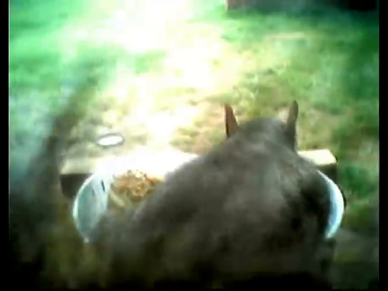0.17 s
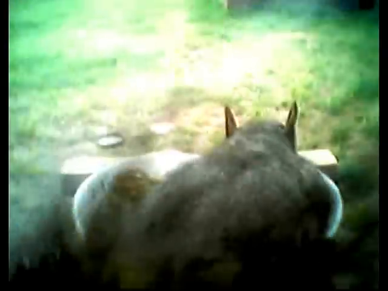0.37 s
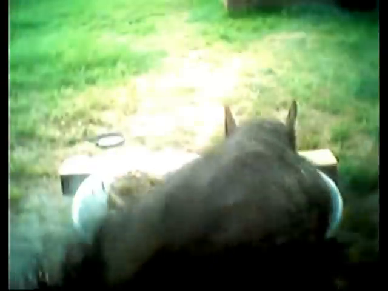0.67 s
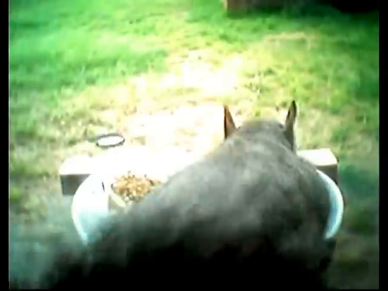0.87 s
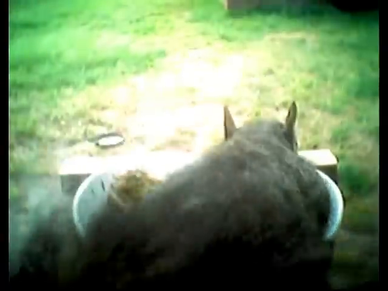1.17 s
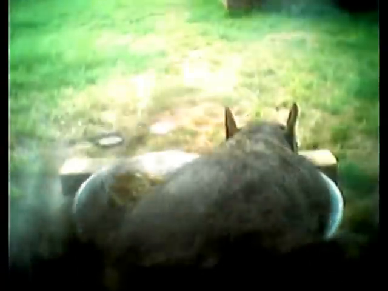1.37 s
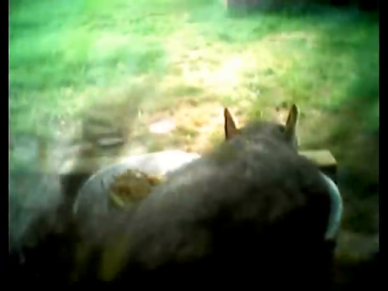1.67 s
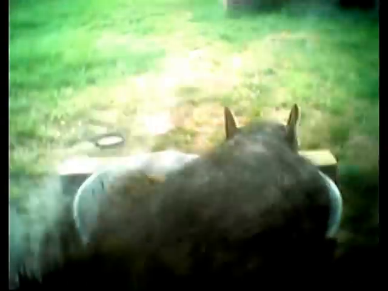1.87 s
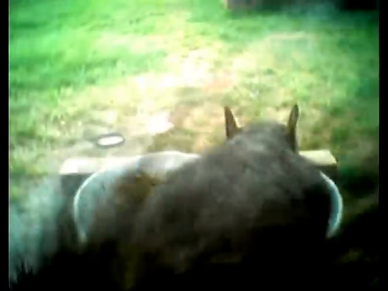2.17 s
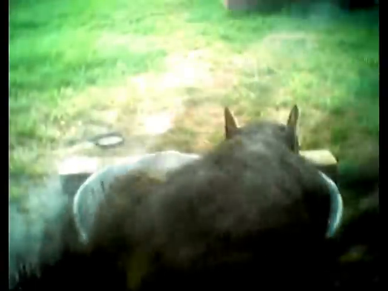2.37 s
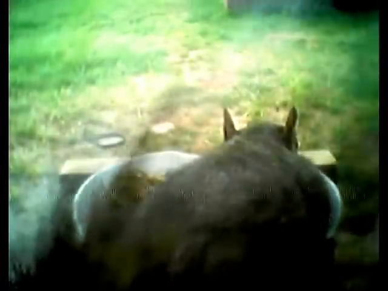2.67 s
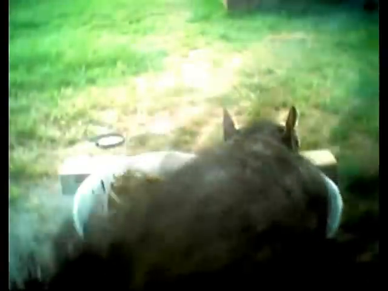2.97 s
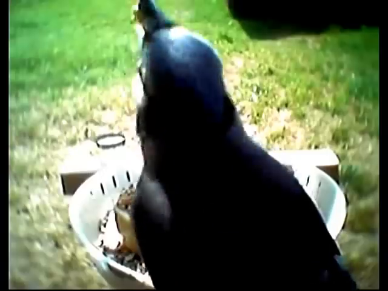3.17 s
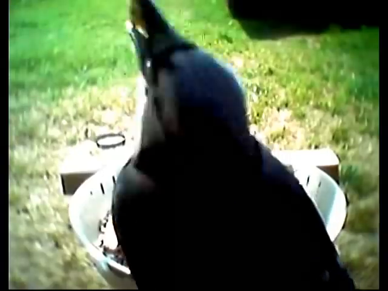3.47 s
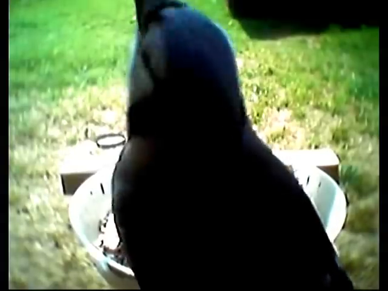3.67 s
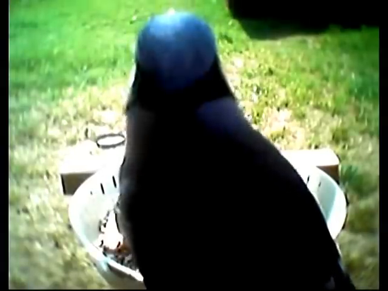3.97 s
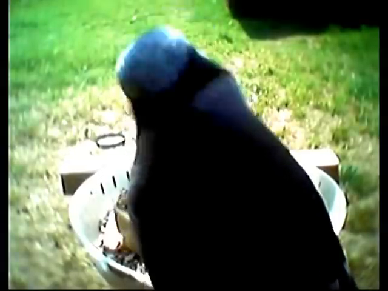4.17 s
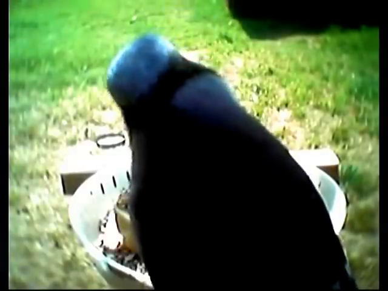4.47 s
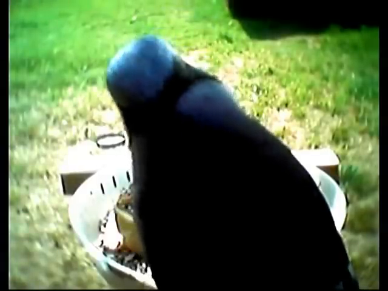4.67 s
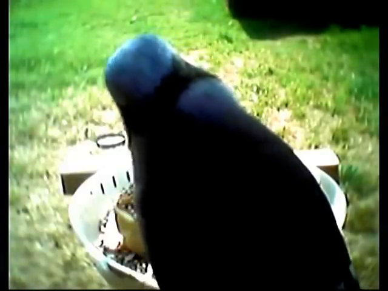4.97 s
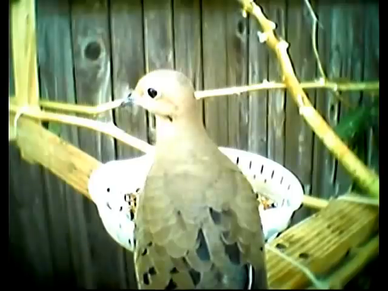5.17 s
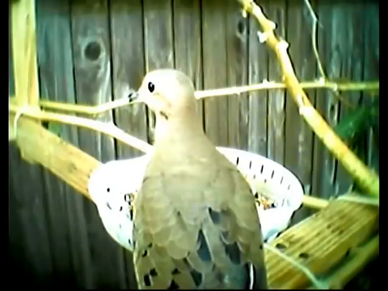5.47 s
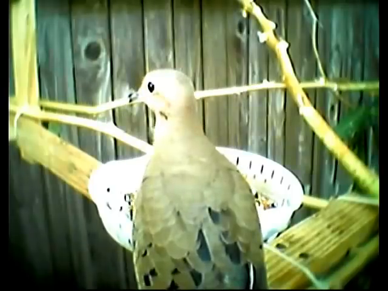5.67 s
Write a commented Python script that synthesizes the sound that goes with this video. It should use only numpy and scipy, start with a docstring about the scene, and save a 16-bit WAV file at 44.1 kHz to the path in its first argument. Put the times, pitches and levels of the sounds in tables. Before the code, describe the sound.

For the first three seconds, a songbird in a backyard repeats a quick down-and-up whistle nine times, evenly spaced, over soft outdoor air. Distant birds answer faintly early on, and a light tick comes near 1.9 seconds. After a brief silence at 3 seconds, a bird right beside the small feeder microphone gives a hoarse rising call. A light tap follows at 3.7, a sinking quaver at 3.8, another rising call at 4, and a hoarse, wavering scream from 4.25 to 4.5, all slightly overloaded. A dull, crackly knock hits the microphone just after. Following another short silence near 5.2 seconds, a low drone with soft hiss holds until the sound cuts off at 5.6. All of this is on the left. A steady electrical buzz runs underneath, faint on the left and alone with electronic hiss on the right.

```python
"""A feeder camera in a backyard plays three shots with short silences between. First a songbird repeats a down-
and-up whistle while far birds answer. In the second shot a close bird gives rising calls, a quaver and a hoarse
scream that overload the small microphone; a dull knock follows. The last shot holds a low drone and faint far
chatter. All this is on the left, over outdoor air. Throughout, the picture signal leaks into the sound as a
buzz: faint on the left, and alone with electronic hiss on the right."""
import sys
import numpy as np
from scipy import signal
from scipy.fft import rfft, irfft
from scipy.io import wavfile

SR = 44100
rng = np.random.default_rng(int(sys.argv[2]) if len(sys.argv) > 2 else 0)


def put_to_file(sound):
    """Save the sound as 16-bit audio at rate SR, in the file named by the first command-line argument."""
    columns = np.atleast_2d(sound).T  # one column per channel
    safe = np.clip(columns, -1, 1)
    whole_steps = np.round(safe * 32767)
    wavfile.write(sys.argv[1], SR, whole_steps.astype(np.int16))


N = 256220
TIME = np.arange(N) / SR


def undb(db):
    """Turn decibels into a gain to multiply by."""
    return 10 ** (np.asarray(db) / 20)


def band(x, low_hz, high_hz, order=2):
    """Keep the sound between two frequencies."""
    edges_hz = [low_hz, min(high_hz, .45 * SR)]
    return signal.sosfilt(signal.butter(order, edges_hz, "band", fs=SR, output="sos"), x)


def rolloff(x, hz, order=2):
    """Soften the treble above hz."""
    return signal.sosfilt(signal.butter(order, min(hz, .45 * SR), fs=SR, output="sos"), x)


def walk(rate_hz):
    """A random curve that wanders around zero with a spread near 1."""
    knots_s = np.arange(0, N / SR + 1, 1 / rate_hz)
    return np.interp(TIME, knots_s, rng.standard_normal(len(knots_s)))


def noise(points):
    """Noise shaped by rows of frequency_hz, level_db_per_hz."""
    hz, db = np.transpose(points)
    bins_hz = np.maximum(np.arange(N // 2 + 1) * SR / N, 1)
    gain = undb(np.interp(np.log(bins_hz), np.log(hz), db))
    return irfft(rfft(rng.standard_normal(N)) * gain, N) * np.sqrt(SR / 2)


def gate(t, start_s, end_s, edge_s):
    """A gain that opens softly at the start and closes softly at the end."""
    return np.sin(np.pi / 2 * np.clip(np.minimum(t - start_s, end_s - t) / edge_s + .5, 0, 1)) ** 2


def bounce(x, delay_s, gain_db):
    """The sound plus its reflection off one surface."""
    return x + undb(gain_db) * np.pad(x, (int(delay_s * SR), 0))[:N]


def echoes(x, early_db, early_s, late_db, late_s):
    """Fence and house wall answer quickly; trees scatter a longer, thin tail without treble."""
    t = TIME[:SR]
    early, late = rng.standard_normal((2, SR)) * (t > .006)
    early *= np.exp(-t / early_s)
    late *= undb(-60 * t / late_s)
    walls = undb(early_db) * early / np.linalg.norm(early)
    trees = undb(late_db) * rolloff(late / np.linalg.norm(late), 3700, order=4)
    return x + signal.fftconvolve(x, walls + trees)[:N]


def yard_air():
    """Gently wavering outdoor air, heard through a microphone that favours 2.2 kHz."""
    # tone colour of the air: frequency_hz, level_db_per_hz
    spectrum = [(25, -80.5), (120, -80.5), (300, -75.5), (600, -77.5), (1100, -80.5), (1600, -82),
                (1950, -79.5), (2230, -73.5), (2600, -83), (3200, -92.5), (4500, -99), (7000, -105),
                (11000, -114)]
    return noise(spectrum) * undb(1.7 * walk(5.5))


def electronic_hiss():
    """The steady noise of the buzzing channel's electronics."""
    # tone colour of the hiss: frequency_hz, level_db_per_hz
    spectrum = [(25, -76.5), (120, -90), (500, -93.5), (1500, -101), (5000, -107), (11000, -115)]
    return noise(spectrum)


def fence_drone():
    """A low drone and soft hiss by the fence, a faint wash of far bird chatter near 2.1 kHz, and one tone that
    wavers in level."""
    # tone colour of the drone, hiss and far chatter: frequency_hz, level_db_per_hz
    spectrum = [(25, -88), (100, -83), (250, -72), (480, -76), (800, -90), (1600, -89), (2080, -74.5),
                (2600, -103), (4000, -130)]
    # the drone's tone: pitch_hz, level_db
    tone = (485, -55.5)
    pitch_hz, level_db = tone
    wave = np.sqrt(2) * np.sin(2 * np.pi * pitch_hz * TIME)
    return noise(spectrum) + undb(level_db + 2 * walk(9.1)) * wave


def picture_buzz(start_s, lower_brightness, fade_share):
    """Each scan down the picture starts on bright lawn, dims and ends blank; these pulses buzz."""
    scan_hz, lawn_share, blank_share = 59.94, .13, .087
    position = (TIME - start_s) * scan_hz % 1
    lawn = np.clip(1 - (position - lawn_share) / fade_share, 0, 1)
    brightness = (lower_brightness + (1 - lower_brightness) * lawn) * (position < 1 - blank_share)
    return rolloff(brightness.mean() - brightness, 4100)


def feeder_taps():
    """Light taps at the feeder, each a burst of noise that dies at once."""
    # dry ticks: start_s, peak_db, centre_hz, decay_s
    taps = [(1.879, -33, 2110, 0.0023), (3.72, -26, 2160, 0.0015), (4.515, -39.5, 250, 0.0018)]
    out = np.zeros(N)
    for start_s, peak_db, centre_hz, decay_s in taps:
        burst = rng.standard_normal(N) * (TIME >= start_s) * np.exp(-abs(TIME - start_s) / decay_s)
        tick = band(burst, centre_hz / np.sqrt(3), centre_hz * np.sqrt(3), order=6)
        out += undb(peak_db) * tick / abs(tick).max()
    return out


def microphone_knock():
    """A dull knock pushes the microphone's thin diaphragm aside with a crackle."""
    # the push: start_s, level_db, length_s
    knock = (4.547, -14.5, 0.0019)
    start_s, level_db, length_s = knock
    progress = np.maximum(TIME - start_s, 0) / length_s
    push = np.clip(1 - progress ** 2, 0, 1)
    crackle = .58 * np.exp(-progress / .7) * band(rng.standard_normal(N), 5000, 10500, order=1)
    return undb(level_db) * (TIME >= start_s) * (crackle - push)


def whistles(notes, waver, flutter_db, edge_s, rasp_db,
             clearing_db=0, rasp_width_hz=400, rasp_above_hz=0, octave=0):
    """A bird's voice organ (syrinx) makes a trembling, gliding tone; a rasp follows its pitch."""
    tremble = 1 + waver * (walk(220) + walk(60)) / np.sqrt(2)
    grit = rolloff(rng.standard_normal(N) + 1j * rng.standard_normal(N), rasp_width_hz / 2, order=5)
    out = np.zeros(N)
    for note in notes:
        time_s, pitch_hz, level_db = np.transpose(note)
        span = (TIME > time_s[0] - edge_s) & (TIME < time_s[-1] + edge_s)
        t = TIME[span]
        phase = 2 * np.pi * np.cumsum(np.interp(t, time_s, pitch_hz) * tremble[span]) / SR
        tone = np.exp(1j * phase)
        rasp = undb(rasp_db - clearing_db * np.linspace(0, 1, len(t))) * grit[span] / grit.std()
        voice = tone * (1 + rasp * np.exp(2j * np.pi * rasp_above_hz * t))
        overtone = octave * (voice * tone).real  # twice the pitch
        loudness = gate(t, time_s[0], time_s[-1], edge_s) * undb(np.interp(t, time_s, level_db))
        out[span] += loudness * (voice.imag + overtone)
    return np.sqrt(2) * out * undb(flutter_db * walk(160))


def far_birds():
    """Birds further off give faint, gliding notes that fade as they go."""
    # straight glides: start_s, length_s, start_hz, end_hz, end_db
    glides = [(.225, 0.022, 2163, 1890, -46.5), (.27, 0.079, 2380, 2495, -50), (.55, 0.14, 2410, 2376, -51),
              (.56, 0.17, 2165, 2038, -51), (4.1, 0.0098, 2900, 2843, -44), (4.14, 0.015, 2820, 2870, -50)]
    fade_db_per_s = 45.5
    notes = [[(start_s, start_hz, end_db + fade_db_per_s * length_s), (start_s + length_s, end_hz, end_db)]
             for start_s, length_s, start_hz, end_hz, end_db in glides]
    calls = whistles(notes, waver=.03, flutter_db=2.5, edge_s=.012, rasp_db=-6)
    return echoes(calls, early_db=-8, early_s=.041, late_db=-5.5, late_s=.66)


def songbird():
    """Each whistle flicks up, falls loud and clear, then rises softly and levels off at a crest."""
    # one whistle a row; crest_s and length_s count from start_s, the top of the fall:
    # start_s, top_hz, dip_hz, crest_hz, fall_s, bend (1 = straight), crest_s, length_s,
    # flick_db, fall_db, rise_db
    slurs = [(0.044, 2734, 2227, 3270, 0.044, 1.26, 0.17, 0.17, -48, -25.5, -45),
             (0.383, 2667, 2117, 3240, 0.046, 1.58, 0.13, 0.143, -31.5, -26.5, -39),
             (0.717, 2810, 2251, 3180, 0.067, 4.5, 0.13, 0.14, -43.5, -29.5, -45.5),
             (1.101, 2718, 2323, 3180, 0.05, 1.75, 0.13, 0.16, -47, -28.5, -43),
             (1.459, 2964, 2207, 3418, 0.052, 3.3, 0.13, 0.16, -43, -26.5, -41.5),
             (1.816, 2805, 2160, 3220, 0.045, 2.33, 0.12, 0.14, -27.5, -26, -38),
             (2.187, 2930, 2160, 3214, 0.043, 1.1, 0.138, 0.143, -44, -29, -42.5),
             (2.546, 2560, 2200, 3200, 0.049, 2.37, 0.13, 0.14, -57, -28.5, -42),
             (2.877, 2696, 2230, 3195, 0.038, 1.17, 0.14, 0.15, -33.5, -29, -42)]
    flick_hz, flick_s, turn_s = 2200, .0075, .016
    rise_from_hz, rise_bend, swell_db = 2695, 1.4, 3.5
    # just before each rise ends, pitch and level dip for a moment: the catch
    catch_before_end_s, catch_s, catch_hz, catch_db = .036, .006, 150, 6
    progress = np.linspace(0, 1, 40)
    arch_db = 7.5 * np.interp(progress, [0, .46, 1], [1, 0, 1]) ** 2  # a fall is weaker at both ends
    falls, rises = [], []
    for (start_s, top_hz, dip_hz, crest_hz, fall_s, bend, crest_s, length_s,
         flick_db, fall_db, rise_db) in slurs:
        fall_hz = dip_hz + (top_hz - dip_hz) * (1 - progress) ** bend
        fall = np.transpose([start_s + fall_s * progress, fall_hz, fall_db - arch_db])
        falls.append(np.vstack([(start_s - flick_s, flick_hz, flick_db), fall]))
        age_s = fall_s + turn_s + (length_s - fall_s - turn_s) * progress
        catch = np.exp(-((age_s - length_s + catch_before_end_s) / catch_s) ** 2)
        below_crest = abs((crest_s - age_s) / (crest_s - age_s[0])) ** rise_bend
        rise_hz = crest_hz - (crest_hz - rise_from_hz) * below_crest - catch_hz * catch
        level_db = rise_db - swell_db * (1 - progress) ** 2 - catch_db * catch
        rises.append(np.transpose([start_s + age_s, rise_hz, level_db]))
    song = whistles(falls, waver=.009, flutter_db=1, edge_s=.004, rasp_db=-21)
    song += whistles(rises, waver=.011, flutter_db=2.6, edge_s=.007, rasp_db=-11)
    song = bounce(song, delay_s=.00258, gain_db=-4.5)  # the ground: boosts some pitches, weakens others
    song = bounce(song, delay_s=.068, gain_db=-20)  # the house
    return echoes(song, early_db=-8.5, early_s=.022, late_db=-11.5, late_s=.67)


def close_bird():
    """Beside the microphone: rising calls that start hoarse and clear, a quaver and a two-voiced scream."""
    # two calls that swell as they climb, one list each: time_s, pitch_hz, level_db
    rising_calls = [
        [(3.12, 1875, -27), (3.142, 1956, -34.5), (3.152, 2035, -23), (3.172, 2054, -22), (3.18, 2127, -18),
         (3.209, 2208, -18)],
        [(4.01, 2110, -34.5), (4.022, 1951, -34.5), (4.05, 2015, -31), (4.08, 2081, -22.5),
         (4.094, 2174, -21.5), (4.103, 2165, -25)],
    ]
    # a trembling call that sinks: time_s, pitch_hz, level_db
    quaver = [(3.828, 2403, -39.5), (3.842, 2200, -31), (3.85, 2130, -34.5), (3.856, 2395, -32),
              (3.866, 2166, -19.5), (3.874, 2346, -27), (3.884, 2183, -21.5), (3.892, 2253, -25.5),
              (3.904, 2108, -25.5), (3.918, 2140, -21), (3.926, 2139, -37), (3.942, 2260, -26.5),
              (3.948, 2217, -20), (3.96, 2090, -30), (3.977, 2115, -31.5)]
    # a hoarse call that wavers and sinks: time_s, pitch_hz, level_db
    scream = [(4.247, 2252, -36), (4.26, 2838, -37.5), (4.272, 2490, -25), (4.288, 2191, -17.5),
              (4.316, 2213, -17.5), (4.338, 2090, -23), (4.361, 2228, -19.5), (4.368, 2267, -21.5),
              (4.39, 2123, -32), (4.426, 1993, -27.5), (4.466, 2031, -25.5), (4.498, 1994, -32.5),
              (4.52, 2032, -32)]
    # higher tones beside the calls: the first row is a brief higher note heard as the shot opens; the others
    # are the syrinx's other side singing higher and beating with the calls: time_s, pitch_hz, level_db
    upper_voice = [
        [(3.098, 2180, -33.5), (3.13, 2310, -32)],
        [(3.959, 2380, -40), (3.977, 2370, -41.5)],
        [(4.284, 2494, -27.5), (4.302, 2785, -40.5), (4.322, 2542, -32.5), (4.36, 2720, -57), (4.41, 2756, -47),
         (4.47, 2660, -53)],
    ]
    octave = .028  # strength of the overtone, as a share of the main tone
    calls = whistles(rising_calls, waver=.009, flutter_db=1.2, edge_s=.005, rasp_db=-4,
                     clearing_db=17, rasp_width_hz=560, rasp_above_hz=70, octave=octave)
    calls += whistles([quaver], waver=.008, flutter_db=1.2, edge_s=.006, rasp_db=-16, octave=octave)
    calls += whistles([scream], waver=.008, flutter_db=1.1, edge_s=.006, rasp_db=-16,
                      rasp_width_hz=700, rasp_above_hz=220, octave=octave)
    calls += whistles(upper_voice, waver=.025, flutter_db=3, edge_s=.006, rasp_db=-3, octave=octave)
    calls = bounce(calls, delay_s=.043, gain_db=-9.5)  # a wall
    return echoes(calls, early_db=-9, early_s=.061, late_db=-15, late_s=.95)


def overload(x):
    """A lopsided amplifier bends the wave and flattens its tops, adding overtones and a low flutter."""
    bend, ceiling, sharpness = .38, .118, 6
    bent = x - bend * x ** 2
    upward = np.maximum(bent, 0)
    flattened = upward / (1 + (upward / ceiling) ** sharpness) ** (1 / sharpness)
    return rolloff(np.minimum(bent, 0) + flattened, hz=5500, order=4)


def scene():
    """Microphone on the left, picture buzz and hiss on the right, both cut shot by shot."""
    # when the sound is on: start_s, end_s
    shots = [(-.0124, 3.044), (3.0956, 5.15), (5.207, 5.606)]
    # each shot's background: air_db, buzz_db, hiss_db, lower_brightness (of the picture; lawn = 1),
    # fade_share (part of the scan over which it dims)
    backgrounds = [(-1.5, -34.5, -4, 0.14, 0.24), (-3, -36.5, -0.5, -.25, 0.28),
                   (-4.5, -41.5, -20, 0.4, 0.23)]
    air, hiss = yard_air(), electronic_hiss()
    drone = fence_drone() * (TIME > shots[-1][0])  # last shot only
    birds = overload(far_birds() + songbird() + close_bird())
    sounds = drone + feeder_taps() + microphone_knock() + birds
    out = np.zeros((2, N))
    for (start_s, end_s), background in zip(shots, backgrounds):
        air_db, buzz_db, hiss_db, lower_brightness, fade_share = background
        buzz = undb(buzz_db) * picture_buzz(start_s, lower_brightness, fade_share)
        left = sounds + undb(air_db) * air + undb(-22.5) * buzz
        right = buzz + undb(hiss_db) * hiss
        out += gate(TIME, start_s, end_s, edge_s=.016) * np.array([left, right])
    return out


def record(dry, coupling_hz=14, top_hz=11100):
    """A coupling capacitor blocks any steady offset; the highest treble is cut steeply."""
    centred = signal.sosfilt(signal.butter(1, coupling_hz, "high", fs=SR, output="sos"), dry)
    return signal.sosfilt(signal.ellip(10, .2, 70, top_hz, fs=SR, output="sos"), centred)


dry = scene()
out = record(dry)
put_to_file(out)
```